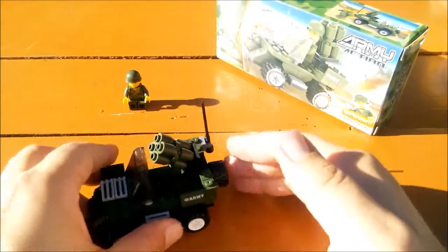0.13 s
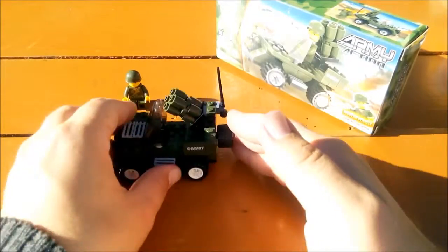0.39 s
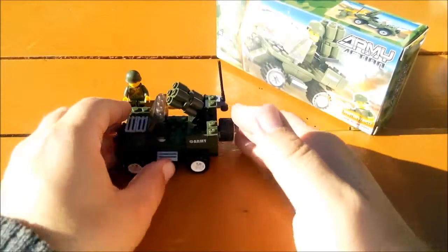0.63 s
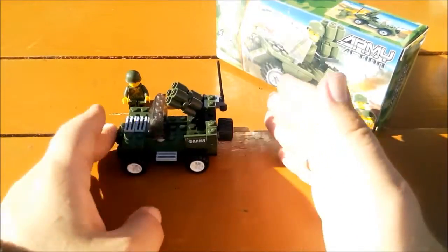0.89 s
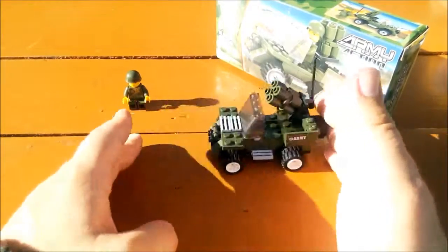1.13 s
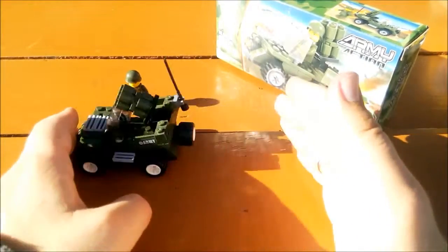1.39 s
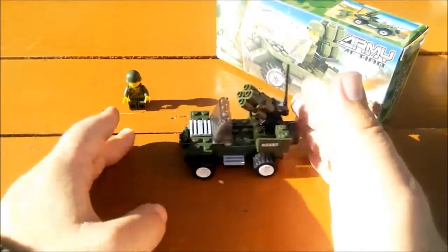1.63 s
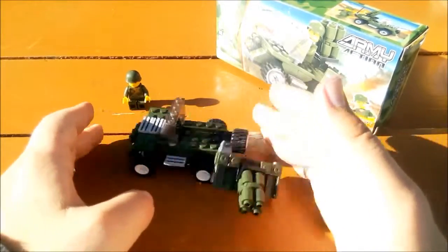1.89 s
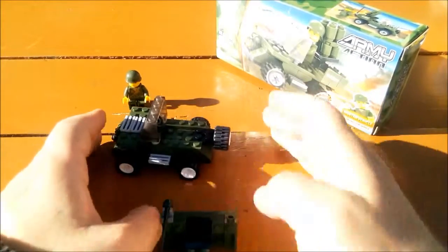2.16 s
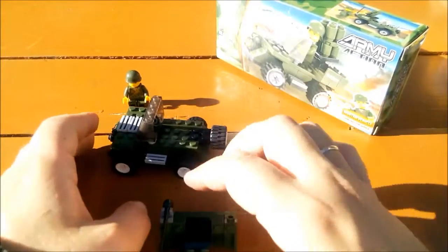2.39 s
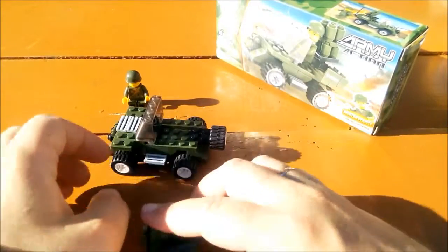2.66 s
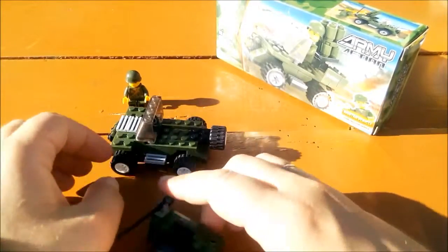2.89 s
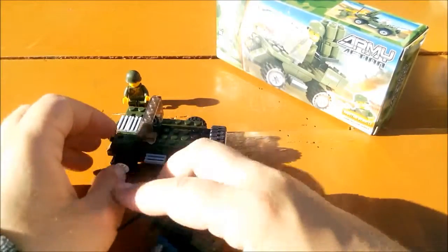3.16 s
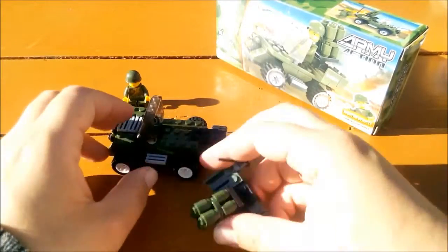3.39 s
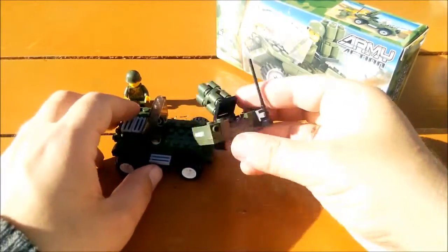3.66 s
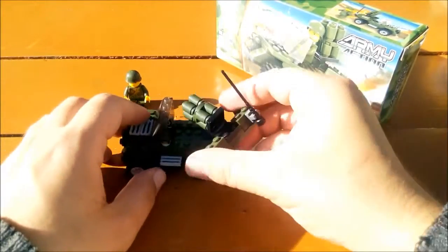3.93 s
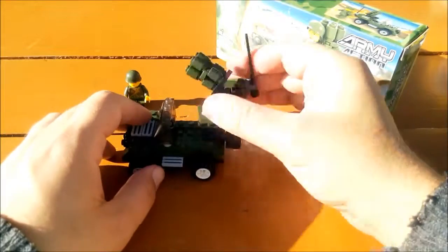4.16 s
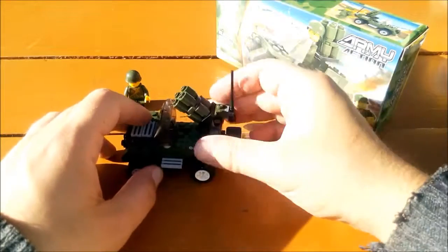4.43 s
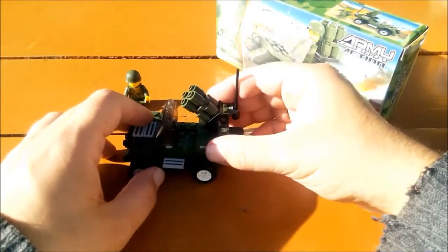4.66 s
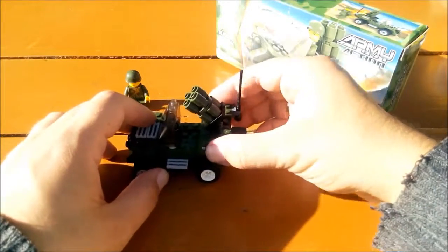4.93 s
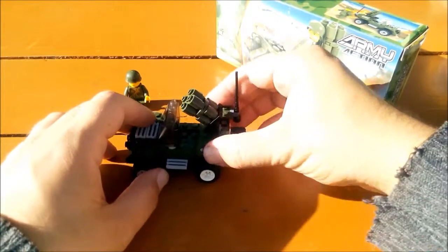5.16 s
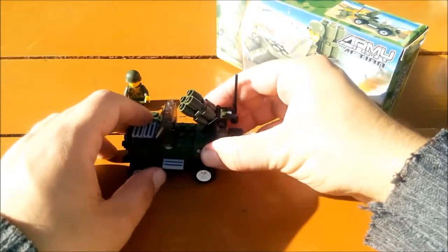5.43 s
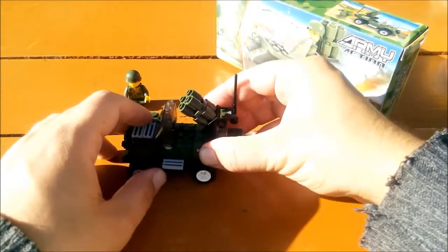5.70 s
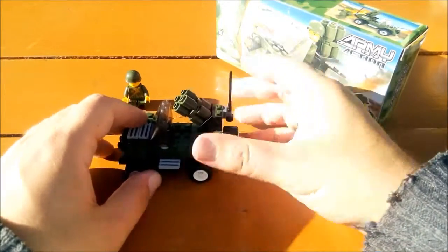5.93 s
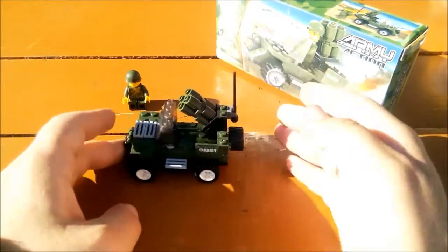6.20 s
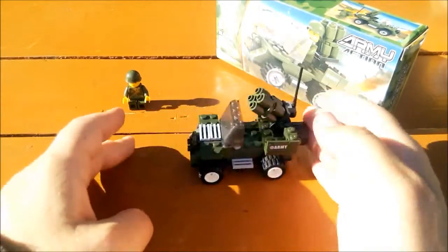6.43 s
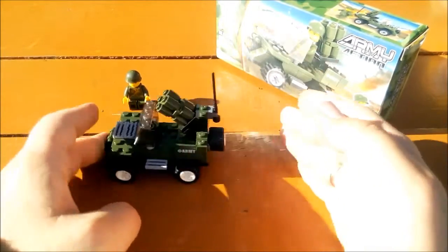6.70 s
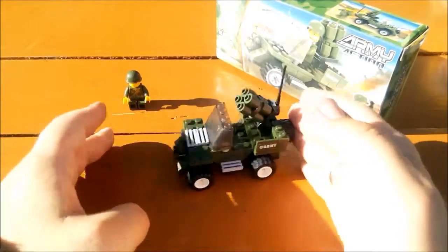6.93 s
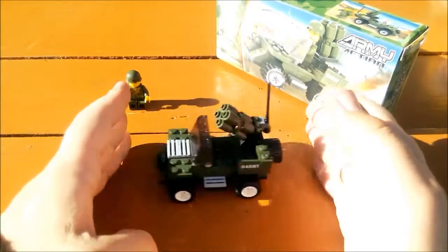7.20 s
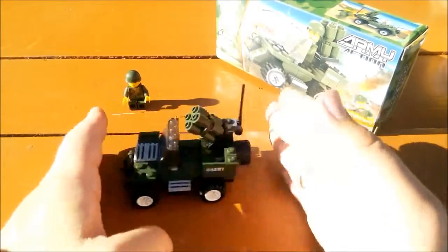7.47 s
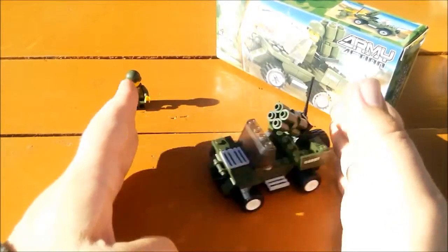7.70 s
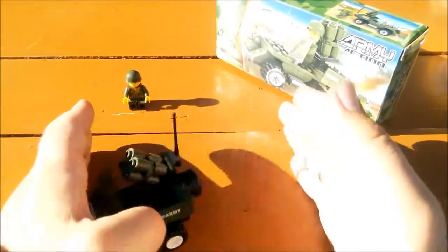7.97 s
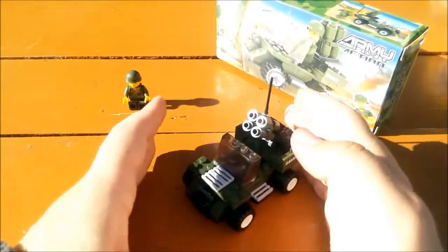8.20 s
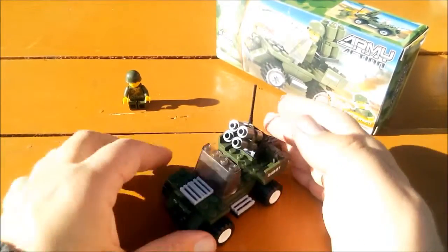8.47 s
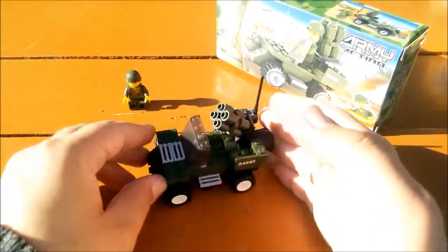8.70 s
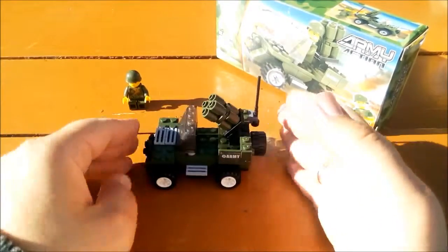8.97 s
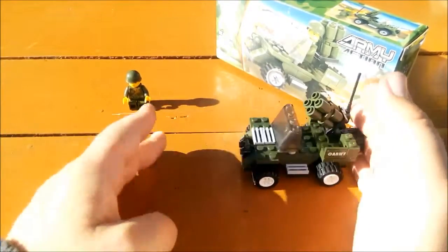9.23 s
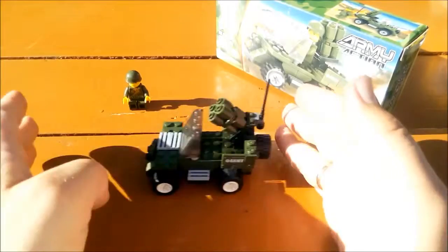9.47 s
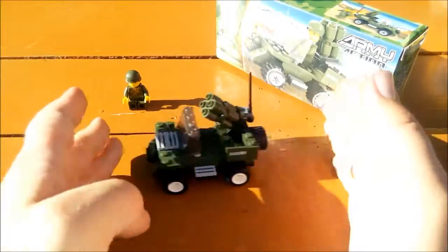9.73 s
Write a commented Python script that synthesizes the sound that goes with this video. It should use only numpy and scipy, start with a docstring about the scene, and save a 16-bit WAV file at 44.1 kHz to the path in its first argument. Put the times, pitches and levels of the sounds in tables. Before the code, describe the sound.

A small plastic brick car rattles back and forth on a wooden table, a part clatters off, gets pressed back on, and rolling resumes.

```python
"""Outdoors, on a wooden table, a small plastic brick car is rolled to and fro between two hands.
Wheels and loose bricks rattle: tiny random impacts ring the tones of the plastic. The top part falls off,
bounces, is dragged and pressed back on. The table top booms under every push as uneven low pushes.
Single knocks chatter, low bumps thud, and a faint tone comes and goes far away over a soft hush.
All is heard close to a two-port microphone, with short reflections."""
import sys
import numpy as np
from scipy import signal
from scipy.fft import rfft, irfft, next_fast_len
from scipy.io import wavfile
from scipy.ndimage import uniform_filter1d

SR = 44100
rng = np.random.default_rng(int(sys.argv[2]) if len(sys.argv) > 2 else 0)


def wav_out(sig):
    """Save sig, one row per channel (or a flat mono array), as 16-bit PCM at SR to the path in sys.argv[1]."""
    wavfile.write(sys.argv[1], SR, np.round(np.clip(np.atleast_2d(sig).T, -1, 1) * 32767).astype(np.int16))


def invert_db(level):
    """Linear amplitude ratio for a level in decibels (20 dB per decade), elementwise."""
    return 10 ** (np.asarray(level, dtype=float) / 20)


N = 434385  # length in samples

# Pushes of the car. Each row: start in seconds, speeding up in seconds, coasting in seconds,
# rattle at full speed in dB, rattle when caught in dB.
CAR_PUSHES = [(.515, 0.0088, 0.049, -51, -42.5), (.6, 0.0066, 0.017, -49.5, -48),
              (.73, 0.0067, .03, -47, -38.5), (1.244, 0.034, 0.056, -41, -32), (1.31, 0.042, .11, -32, -56),
              (1.51, 0.063, .15, -34, -41), (1.74, .02, .08, -49, -47.5), (1.835, 0.04, 0.11, -32, -31.5),
              (2.135, .01, .04, -47, -41), (2.161, 0.05, 0.14, -27, -38), (2.39, .015, 0.027, -44.5, -47.5),
              (6.53, .07, .09, -32.5, -37), (6.76, 0.065, 0.16, -35, -39), (7.02, 0.062, 0.084, -30, -30.5),
              (7.22, .06, .215, -35, -37.5), (7.48, 0.031, 0.14, -29, -35), (7.68, 0.06, 0.15, -30.5, -39),
              (7.92, 0.07, 0.091, -29.5, -28.5), (8.09, 0.072, .28, -30.5, -36.5),
              (8.4, 0.038, 0.15, -30, -42.5), (8.58, 0.037, 0.07, -46.5, -49.5),
              (8.71, 0.0083, 0.16, -58, -60.5), (8.84, 0.0094, 0.0074, -59, -41.5),
              (9.035, .01, 0.0056, -47.5, -57), (9.1, .025, 0.008, -25.5, -32.5),
              (9.2, 0.01, 0.026, -59, -59.5), (9.42, 0.13, 0.079, -31, -46), (9.67, 0.12, 0.11, -29, -32.5)]
# Scrapes of the loose part, and one short shake after a knock. Each row: start in seconds,
# rise in seconds, fade in seconds, level in dB, hollow sound against that level in dB.
PART_SCRAPES = [(2.46, .012, 0.098, -39.5, 4.5), (2.85, 0.067, 0.029, -45, 4),
                (3.005, 0.0034, 0.19, -46.5, 5.5), (3.115, 0.014, .1, -36, -0.5),
                (3.39, 0.038, 0.084, -52, 3.5), (3.52, 0.0068, 0.16, -58.5, 5),
                (3.54, 0.11, 0.087, -51, -1.5), (3.915, 0.028, 0.044, -57, -4.5),
                (4.065, .04, 0.11, -52, -6.5), (4.628, 0.019, 0.0084, -51.5, -9),
                (4.74, 0.0072, 0.028, -49.5, -2), (5.323, 0.0057, 0.03, -37.5, 0),
                (6.18, 0.017, 0.39, -55, -15)]
# Single knocks. Each row: time in seconds, peak of the bright click in dB, loudest ring in Hz,
# hollow sound against the click in dB, table ring against the click in dB.
BRICK_KNOCKS = [(0.2877, -37.5, 4800, -18, -17), (0.522, -34.5, 2620, -12, -7),
                (.5835, -26.5, 4000, -27, -7.5), (0.609, -19, 3740, -22, -22),
                (0.6238, -24.5, 3920, -15.5, -29), (0.7176, -34.5, 4760, -17, -13.5),
                (0.7397, -22, 2773, -14, -24.5), (1.461, -39, 2650, -26, -12.5),
                (1.5699, -21, 2634, -9, -15), (1.7657, -21.5, 2600, -19, -19.5),
                (1.8443, -19, 6590, -27, -11.5), (2.1423, -37, 2640, -11, -3.5),
                (2.1828, -22.5, 2697, -19, -16), (2.2677, 5.5, 3960, -33, -35),
                (2.278, -16, 3120, -18, -12), (2.323, -5, 3143, -37, -33),
                (2.331, -15.5, 3027, -30.5, -29.5), (2.354, -8, 3720, -25, -29),
                (2.375, -10.5, 3158, -21, -30), (2.3868, -18, 3080, -21, -39),
                (2.3986, -21.5, 3960, -15, -25.5), (2.4346, -31, 3980, -6, -17),
                (2.4573, -11.5, 4897, -7.5, -23), (2.4845, -29.5, 2730, -22, -27.5),
                (2.605, -41.5, 3330, -10, -5.5), (2.9037, -29, 4355, -4, -10),
                (3.0052, -24.5, 3920, -3, -24), (3.0654, -34, 3850, -4.5, -14.5),
                (3.08, -35.5, 3950, 0, -10.5), (3.1199, -25, 3920, -12, -10), (3.1783, -32, 4046, 4, -15),
                (3.215, -36.5, 2430, 2.7, -6.5), (3.414, -38, 2170, -8, -8.5), (3.4424, -40.5, 4660, 7, -4),
                (3.777, -42.5, 3670, -12, -6), (4.0952, -35.5, 2720, -15, -3.5),
                (4.627, -23, 3620, -20, -13.5), (4.6905, -44.5, 4700, -23, -20),
                (4.7439, -30.5, 4800, -25, -11), (4.76, -39, 4080, -11.5, 4),
                (4.8657, -39.5, 2850, -13, -9), (4.9625, -50, 3260, -9, -13),
                (5.3253, -18, 4030, -11.5, -2), (6.2145, -38, 3990, -17, -11),
                (6.3094, -41.5, 4240, -28, -9.5), (6.57, -28.5, 2690, -20, -8),
                (6.789, -26, 5040, -11, -11), (7.4494, -18, 3330, -31, -9), (8.0536, -4, 4900, -22.5, -32),
                (8.1203, -17.5, 3650, -24, -9.5), (8.4255, -24.5, 2620, -14, -7.5),
                (8.536, -22, 3270, -32, -22.5), (8.6764, -27, 2860, -16, -20.5),
                (8.7224, -32, 3600, -14, -18), (8.7728, -34, 2540, -27, -37), (8.8375, -24, 3860, -24, -14),
                (8.8516, -19, 4700, -33, -27), (9.035, -32, 2620, -21, -18.5),
                (9.1195, -16.5, 3480, -5, -8)]
# Low buffeting bumps of wind or handling. Each row: time in seconds, peak in dB, pitch in Hz.
LOW_BUMPS = [(0.687, -25.5, 110), (.944, -17.5, 193.6), (.958, -17.5, 143.3), (.973, -20, 186),
             (1.013, -17, 168), (1.0355, -5, 195.3), (1.052, -17.5, 359), (1.063, -24, 91),
             (1.091, -18.5, 120), (1.179, -24, 89.6), (5.543, -45, 111.7), (6.087, -41, 79.4),
             (9.24, -28, 94), (9.263, -25, 113), (9.358, -25.5, 85.4), (9.705, -13, 104)]
# Tones that ring in the car. Each row: pitch in Hz, width in Hz, relative level in dB.
CAR_MODES = [(531, 80, 0), (740.4, 150, 0), (1103, 330, -8), (1450, 120, -9), (1833, 380, -5.5),
             (2620, 140, 0), (2725, 190, -1.5), (3293, 230, -4), (3650, 90, -3.5), (4200, 200, -13.5),
             (4874, 630, -6), (5380, 160, -8.5)]
# Tones that ring in the loose part. Each row: pitch in Hz, width in Hz, relative level in dB.
PART_MODES = [(747, 210, -8.5), (1217, 82, -10.5), (1610, 430, -9), (1850, 180, -12), (2600, 190, -7.5),
              (3224, 44, -11.5), (3920, 170, 0.5), (4740, 330, -2.2), (5560, 700, -8), (4900, 82, -10.5),
              (6500, 340, -15.5)]
# Sound of the plastic between those tones. Each row: frequency in Hz, relative level in dB.
PLAIN_PLASTIC = [(250, -39), (450, -9), (1000, -16), (2300, -17.5), (2800, -8.5), (4500, -7), (6000, -14),
                 (7600, -25), (8100, -41.5)]
# Tones of the struck table top. Each row: pitch in Hz, relative level in dB, time to fall 60 dB in seconds.
TABLE_TONES = [(81, -4.5, 0.22), (120, -5, 0.1), (150.8, 11.5, 0.12), (243.6, -3.5, 0.25), (320, -5, 0.089)]
# Tone color of the table boom. Each row: frequency in Hz, relative level in dB per Hz.
BOOM_COLOR = [(20, -46), (40, -8.5), (75, 6), (110, 3), (150, 4), (205, -13), (240, -13.5), (290, -7.5),
              (380, -20.5), (500, -24.5), (900, -43), (1500, -59.5), (4000, -91.5)]
# Tone color of the hush and hiss. Each row: frequency in Hz, relative level in dB per Hz.
AIR_COLOR = [(15, -41), (25, -8), (70, -12.5), (184, -10.5), (319, -30), (369, -21.5), (569, -21),
             (641, -25.5), (741, -26.5), (1230, -29.5), (1560, -30.5), (2600, -28), (3890, -24.5),
             (5800, -26), (7810, -32.5), (10200, -71.5), (17200, -120)]
# How alike the air is at both ports. Each row: frequency in Hz, left-right likeness from -1 to 1.
AIR_LIKENESS = [(60, -0.45), (160, -0.11), (410, -0.42), (1070, -0.28), (2810, 0.12), (7360, -0.89)]
# How the ports shade the sound. Each row: frequency in Hz, left over right in dB.
PORT_SHADES = [(40, -5), (160, 1.8), (410, -4), (1070, 1.5), (2000, -0.5), (2810, 2.5), (5000, 3.5),
               (7360, 4)]
# Where the bricks are. Each row: time in seconds, left over right in dB.
BRICK_PLACES = [(0.0, 4), (0.38, 1), (1.86, -0.5), (3.23, 2.5), (4.2, -1), (4.5, 0.5), (5.62, 2), (5.79, 3),
                (6.36, 0.5), (9.85, 2.5)]
# Reflections before they are spread out in time. Each row: frequency in Hz, level against the direct sound in dB.
ECHO_COLOR = [(100, -21), (300, -5), (1000, -7.5), (2500, -10), (4500, -10), (7500, 1.5)]
# Hands bearing down on the table. Each row: start in seconds, rise in seconds, fade in seconds,
# level in dB, higher table tones against that level in dB.
HAND_SHOVES = [(.65, 0.12, .3, -37.5, -15), (.88, 0.11, 0.054, -28.5, -6), (.99, 0.052, 0.12, -21, -12),
               (2.1, 0.16, 0.49, -39, -2), (2.65, 0.099, .3, -52.5, -17), (2.82, 0.1, .3, -51.5, 3.5),
               (3.08, 0.058, 0.19, -52.5, 7), (3.37, 0.051, 0.76, -58, 1),
               (4.04, 0.075, 0.43, -49.5, -13.5), (4.33, 0.14, .06, -54, -13.5),
               (4.55, 0.13, 0.036, -51, -5), (4.71, 0.011, 0.22, -51.5, -9), (4.8, 0.098, 0.048, -56.5, -3),
               (5.0, .228, .06, -63, -11.5), (5.47, 0.079, 0.31, -57, -15),
               (5.82, .11, 0.157, -49.5, -17.5), (6.04, 0.041, 0.32, -63, -15),
               (7.21, .05, 0.21, -42.5, -13), (8.8, 0.073, 0.21, -46.5, -21.5),
               (9.03, 0.13, 0.31, -36, -28.5), (9.42, 0.15, 0.19, -31.5, -12.5),
               (9.65, 0.12, 0.43, -30.5, -15.5)]
# Hands resting on the table. Each row: time in seconds, level in dB.
HANDS_AT_REST = [(0, -51.5), (.25, -57.5), (.48, -45.5), (1.25, -45), (2.0, -46.5), (2.55, -60.5),
                 (4.0, -59), (4.5, -63.5), (6.5, -57.5), (6.6, -48.5), (8.72, -42.5), (8.9, -59.5),
                 (9.3, -52.5), (9.85, -42)]
# A faint far tone. Each row: start in seconds, length in seconds, pitch in Hz, level in dB.
FAR_NOTES = [(0.862, 0.25, 896, -72), (1.08, .2, 848, -73), (1.423, 0.14, 900, -66)]

# between these times the part is loose or the car is held, so knocks ring damped
DAMPED_FROM_S, DAMPED_UNTIL_S = 2.25, 5.9
RISE_DB, FADE_DB, STOP_DB_PER_S = 36, 26.5, 646  # depth of rises and fades; how fast a gesture falls silent
FULL_SPEED_DB = -35  # rattle level that counts as speed 1


def evened(x):
    """Scales to an rms of 1."""
    return x / np.sqrt(np.mean(x ** 2) + 1e-20)


def read(points, hz):
    """Reads a table of frequencies and values at the frequencies hz."""
    f, value = np.transpose(points)
    return np.interp(np.log(hz + 1), np.log(f + 1), value)


def add(mix, s, sound):
    """Mixes a sound in at time s, in seconds."""
    part = mix[round(s * SR):][:len(sound)]
    part += sound[:len(part)]


def causal(gain):
    """Turns gains over frequency into a minimum-phase response, which starts as promptly as it can."""
    mirrored = np.r_[gain, gain[-2:0:-1]]
    log = np.log(np.maximum(mirrored, 1e-5))
    return np.fft.ifft(np.exp(np.conj(signal.hilbert(log)))).real[:len(gain) // 2]


def clumps(size):
    """Slow random swings, rms about 1, without extreme tops."""
    smooth = uniform_filter1d(rng.standard_normal(N), size)
    return np.minimum(evened(uniform_filter1d(smooth, size)), 1.8)


def stroke(start, rise, hold, top_db, end_db):
    """Power of one gesture: a rounded rise, a straight glide from top_db to end_db, a quick stop."""
    t = np.arange(0, rise + hold + .15, 1 / SR)
    db = top_db - RISE_DB * np.clip(1 - t / rise, 0, 1) ** 2
    db += (end_db - top_db) * np.clip((t - rise) / hold, 0, 1)
    db -= STOP_DB_PER_S * np.maximum(t - rise - hold, 0)
    return start, invert_db(2 * db)


def fading_gains(rows):
    """Strength of gestures that rise and fade, and of their second voice."""
    power = np.zeros((2, N))
    for start, rise, fade, db, share_db in rows:
        for voice, level_db in zip(power, (db, db + share_db)):
            add(voice, *stroke(start, rise, fade, level_db, level_db - FADE_DB))
    return np.sqrt(power)


def mode_powers(modes, hz):
    """Power of the plain plastic and of each ringing tone, one row each."""
    peaks = [invert_db(2 * db) / (1 + (2 * (hz - f) / w) ** 2) ** 2 for f, w, db in modes]
    return np.array([invert_db(2 * read(PLAIN_PLASTIC, hz)), *peaks])


def halves(power, hz):
    """Splits power at 2200 Hz into a hollow low share and a bright share, each of total energy 1."""
    bright = 1 / (1 + (2200 / (hz + 1)) ** 12)
    return [power * share / (power * share).sum() * len(hz) for share in (1 - bright, bright)]


def rattle(gain, hollow_gain, modes, per_s, spread_db, jolt_db, own_db, clump_s):
    """Every tone gets its own dense tiny impacts; jolts of the whole toy sway them all together."""
    hz = np.fft.rfftfreq(8192, 1 / SR)
    size = int(clump_s * SR)
    jolts, out = clumps(size), 0
    for hollow, bright in zip(*halves(mode_powers(modes, hz), hz)):
        draw = rng.random(N)
        chance = per_s / SR / 2  # for each of the two signs
        signs = (draw < chance) * 1. - (draw > 1 - chance)
        hits = signs * invert_db(spread_db * np.minimum(rng.exponential(1, N), 4))
        hits = evened(hits * invert_db(jolt_db * jolts + own_db * clumps(size)))
        out = out + signal.oaconvolve(hits * hollow_gain, causal(np.sqrt(hollow)))[:N]
        out = out + signal.oaconvolve(hits * gain, causal(np.sqrt(bright)))[:N]
    return out


def air():
    """Outdoor hush and microphone hiss: colored noise with faint drifting patches."""
    frames, hz = N // 256 + 5, np.fft.rfftfreq(1024, 1 / SR)
    a, b, c, d, patches = rng.standard_normal((frames, 513, 5)).T
    patches = uniform_filter1d(patches, 14, 0)  # across frequency
    patches = evened(uniform_filter1d(patches, 12, 1))  # across time
    same = np.clip(read(AIR_LIKENESS, hz), -1, 1)[:, None]
    left = a + 1j * b
    right = same * left + np.sqrt(1 - same ** 2) * (c + 1j * d)
    color = invert_db(read(AIR_COLOR, hz)[:, None] + 0.9 * patches)
    noise = signal.istft(np.array([left, right]) * color, nperseg=1024, noverlap=768)[1][:, :N]
    return invert_db(-54.5) * evened(noise)


def boom(speed):
    """Uneven low pushes shake the table; wheels, resting hands and shoves each have their share of higher tones."""
    t, hz = np.arange(N) / SR, np.fft.rfftfreq(16384, 1 / SR)
    pushes = rng.standard_normal(N) * (rng.random(N) < 600. / SR)  # about 600 a second
    pushes = pushes * invert_db(1.5 * rng.exponential(1, N))
    high = 1 / (1 + (230 / (hz + 1)) ** 10)  # share of the higher tones, split at 230 Hz
    color = invert_db(read(BOOM_COLOR, hz))
    tones = [causal(color * np.sqrt(share)) for share in (1 - high, high)]
    deep, upper = [evened(signal.oaconvolve(pushes, tone)[:N]) for tone in tones]
    # the boom under the wheels follows their speed, smoothed over 0.055 s
    wheels = invert_db(-42) * abs(uniform_filter1d(speed, int(0.055 * SR))) ** 0.78
    rest = invert_db(np.interp(t, *np.transpose(HANDS_AT_REST)))
    shove, shove_upper = fading_gains(HAND_SHOVES)
    deep_gain = np.sqrt(wheels ** 2 + rest ** 2 + shove ** 2)
    upper_gain = np.sqrt((invert_db(-8) * wheels) ** 2 + (invert_db(-16) * rest) ** 2 + shove_upper ** 2)
    return deep_gain * deep + upper_gain * upper


def body(modes):
    """Hollow and bright responses of a brick object struck as a whole."""
    hz = np.fft.rfftfreq(8192, 1 / SR)
    return [causal(np.sqrt(p)) for p in halves(mode_powers(modes, hz).sum(0), hz)]


def table_ring(t):
    """The heavy table top yields over a few milliseconds after one push, then rings; peak 1."""
    ring = sum(invert_db(db - 60 * t / t60) * np.sin(2 * np.pi * hz * t) for hz, db, t60 in TABLE_TONES)
    ring *= 1 - np.exp(-t / .003)
    return ring / abs(ring).max()


def knocks():
    """Each knock chatters for a few milliseconds in the bricks and pushes the table top down."""
    out, t = np.zeros(N), np.arange(6000) / SR
    fade = invert_db(-60 * (t / 0.025) ** 0.77) * (1 - np.exp(-t / 0.000097))  # down 60 dB after 0.025 s
    for s, peak_db, hz, hollow_db, table_db in BRICK_KNOCKS:
        chance = rng.standard_normal(6000)
        chatter = chance * abs(chance) ** 0.32 * fade
        chatter[0] += 2.5  # the first contact
        modes = PART_MODES if DAMPED_FROM_S < s < DAMPED_UNTIL_S else CAR_MODES
        responses = body([*modes, (hz, 300, 5), (1300, 1500, -9)])
        hollow, bright = [signal.fftconvolve(chatter, p)[:6000] for p in responses]
        click = bright / abs(bright).max() + invert_db(hollow_db) * hollow / abs(hollow).max()
        add(out, s, invert_db(peak_db) * (click - invert_db(table_db) * table_ring(t)))
    return out


def rolling_gain():
    """Rattle strength of the wheels over time: the powers of all pushes add up."""
    power = np.zeros(N)
    for row in CAR_PUSHES:
        add(power, *stroke(*row))
    return np.sqrt(power)


def rolling_car(roll, speed):
    """Wheels and bricks rattle; the hollow sound grows less than the bright one as the car speeds up."""
    hollow = invert_db(FULL_SPEED_DB - 12.5) * speed ** (1 - 0.27)  # loses 0.27 dB for each dB of rattle
    return rattle(roll, hollow, CAR_MODES, per_s=3000., spread_db=3.0, jolt_db=1.82, own_db=3.0, clump_s=0.0044)


def bumps():
    """Low buffeting bumps of wind or handling: several close swings make one rounded thud."""
    out = np.zeros(N)
    for s, peak_db, hz in LOW_BUMPS:
        u = np.arange(0, 4.0, hz / SR)  # time counted in swings
        swing = np.sin(2 * np.pi * u) * u ** 2.1 * np.exp(-u / 0.31)
        add(out, s, invert_db(peak_db) * swing / abs(swing).max())
    return out


def far_tone():
    """Soft pure notes from far away, each swelling and fading."""
    out = np.zeros(N)
    for s, length, hz, db in FAR_NOTES:
        t = np.arange(0, length, 1 / SR)
        swell = np.sqrt(2 * np.sin(np.pi * t / length))
        add(out, s, invert_db(db) * swell * np.sin(2 * np.pi * hz * t))
    return out


def scraped_part():
    """The loose part scrapes, and shakes once after a knock: dense tiny impacts ring its own tones."""
    gain, hollow = fading_gains(PART_SCRAPES)
    return rattle(gain, hollow, PART_MODES, per_s=4400.0, spread_db=2.0, jolt_db=-1.0, own_db=5.5, clump_s=0.0054)


def nearby(x, t60, turns_per_s):
    """Short reflections off table, hands and box, other ones at each port; they change as the hands move."""
    color = invert_db(read(ECHO_COLOR, np.fft.rfftfreq(2048, 1 / SR)))
    x = signal.oaconvolve(x, causal(color))[:N]
    taps = np.zeros((3, 2, 3000))  # three sets of reflections, two ports
    at = np.arange(10, 2980, 20) + rng.integers(0, 20, (3, 2, 149))
    np.put_along_axis(taps, at, rng.choice([-1., 1.], at.shape), 2)
    taps *= invert_db(-60 * np.arange(3000) / SR / t60)
    turn = 2 * np.pi * turns_per_s * np.arange(N) / SR
    out = 0
    for k, tail in enumerate(taps):
        # the sets swell in turn, at a steady total power
        window = np.sqrt(2 / 3) * np.cos(turn + k * np.pi / 3)
        out = out + signal.oaconvolve((x * window)[None], tail / np.linalg.norm(tail[0]), axes=1)[:, :N]
    return out


def ports(x):
    """The sound reaches the left port first, and each port shades it in its own way."""
    right_lag_s = 4.6e-5
    size = next_fast_len(N)
    hz = np.fft.rfftfreq(size, 1 / SR)
    # half of the level and time difference goes to each port
    tilt = invert_db(read(PORT_SHADES, hz) / 2) * np.exp(1j * np.pi * hz * right_lag_s)
    return irfft(rfft(x, size) * np.array([tilt, 1 / tilt]), size)[:, :N]


def scene():
    """Car, loose part, table and bumps, heard close, over the open air."""
    roll = rolling_gain()
    speed = roll / invert_db(FULL_SPEED_DB)
    bricks = knocks() + rolling_car(roll, speed) + scraped_part()
    lows = boom(speed) + bumps()
    s, pan_db = np.transpose(BRICK_PLACES)
    side = invert_db(np.interp(np.arange(N) / SR, s, pan_db) / 2)
    close = ports(bricks) * [side, 1 / side] + ports(lows)
    return close + nearby(bricks + lows, t60=0.027, turns_per_s=1.3) + air() + far_tone()


def roll_off(x):
    """The treble ends steeply here."""
    return signal.sosfilt(signal.butter(12, 7960, fs=SR, output="sos"), x)


def record(dry):
    """The treble ends early, at 7900 Hz, and peaks beyond full scale clip."""
    narrow = signal.oaconvolve(dry, signal.firwin(255, 7900, fs=SR)[None], "same")
    return roll_off(np.clip(narrow, -1, 1))


dry = scene()
out = record(dry)
wav_out(out)
```